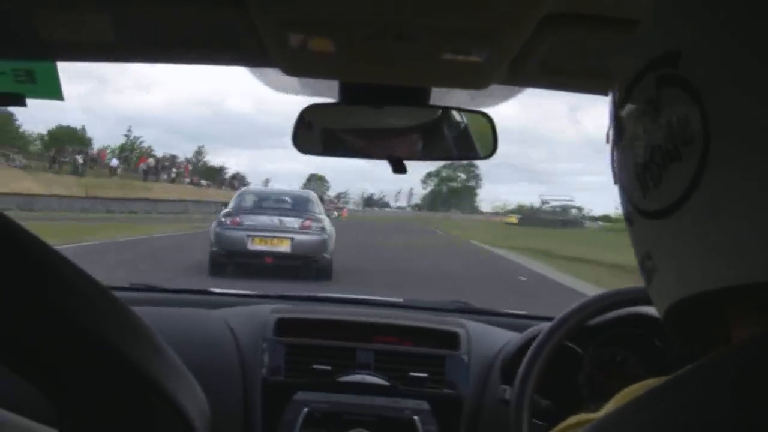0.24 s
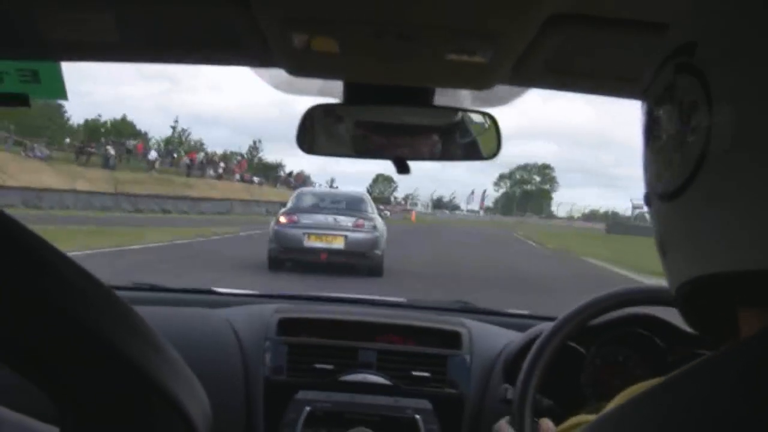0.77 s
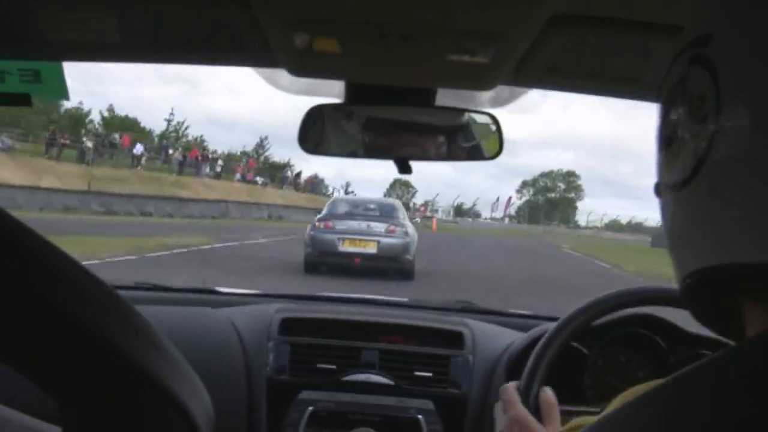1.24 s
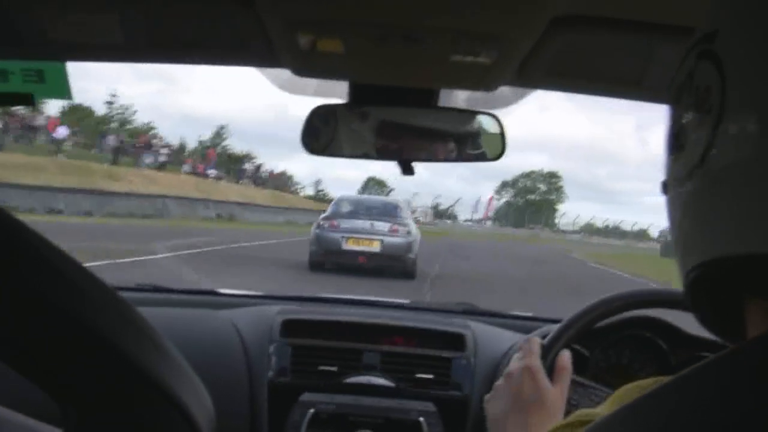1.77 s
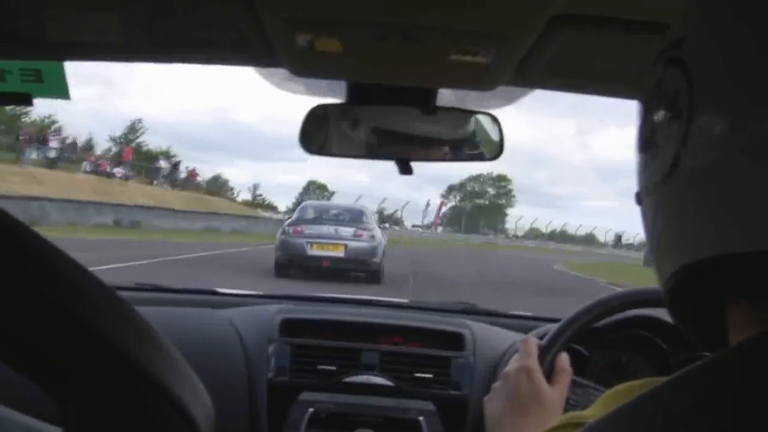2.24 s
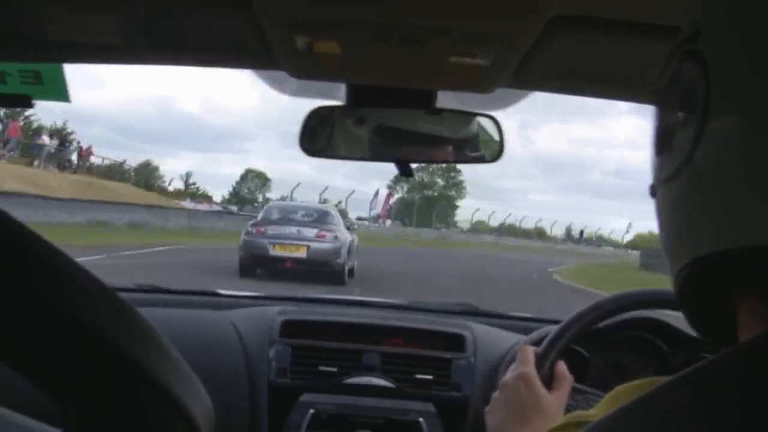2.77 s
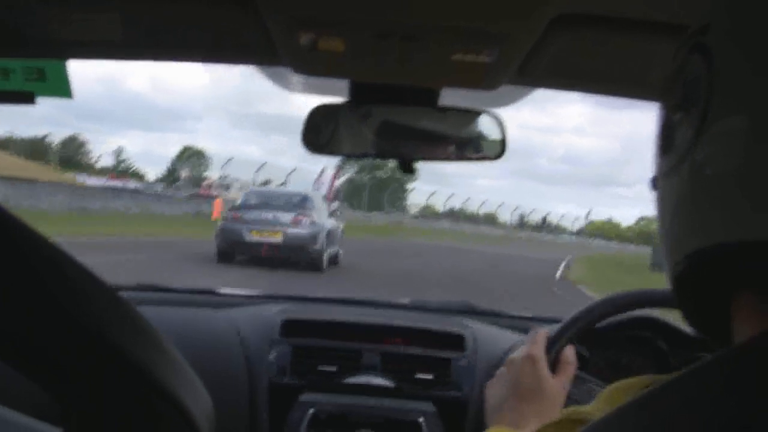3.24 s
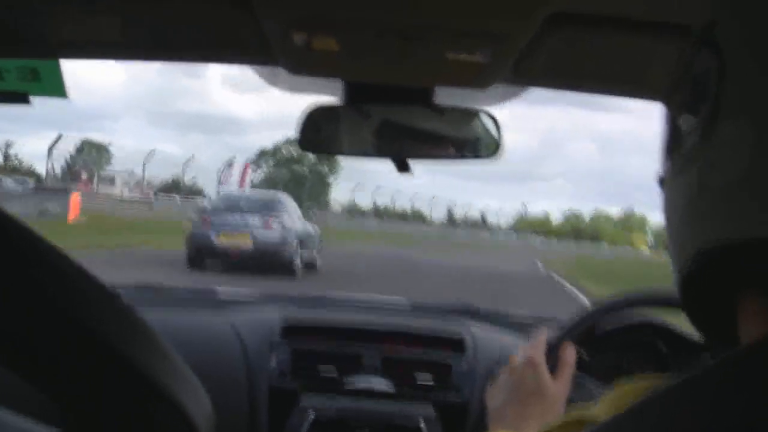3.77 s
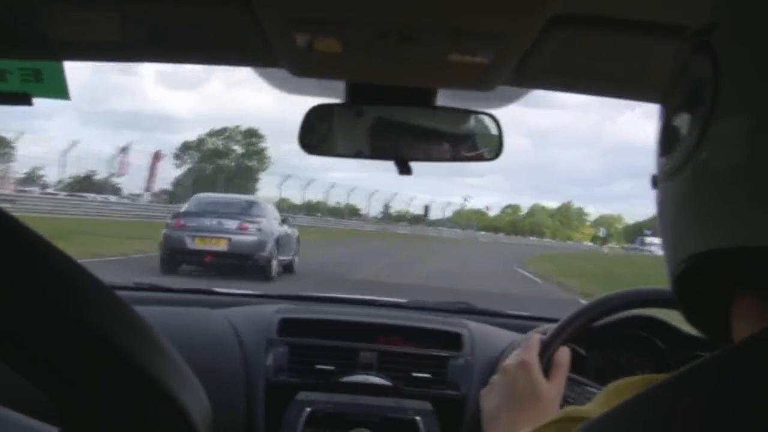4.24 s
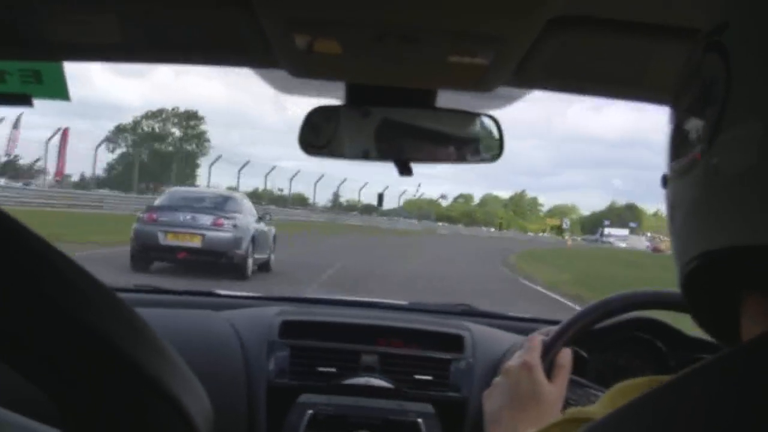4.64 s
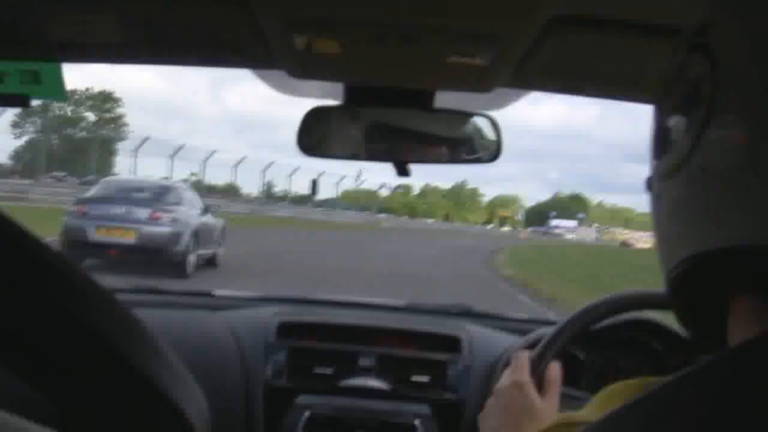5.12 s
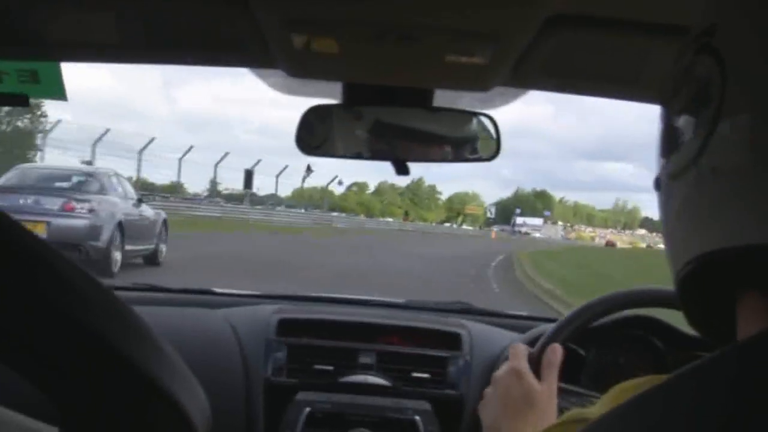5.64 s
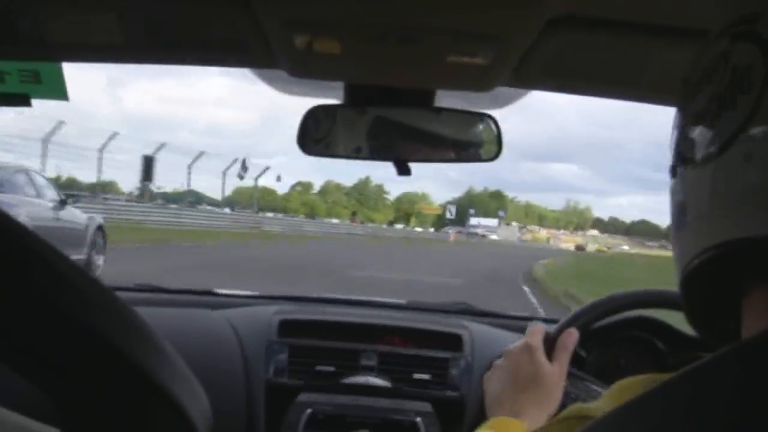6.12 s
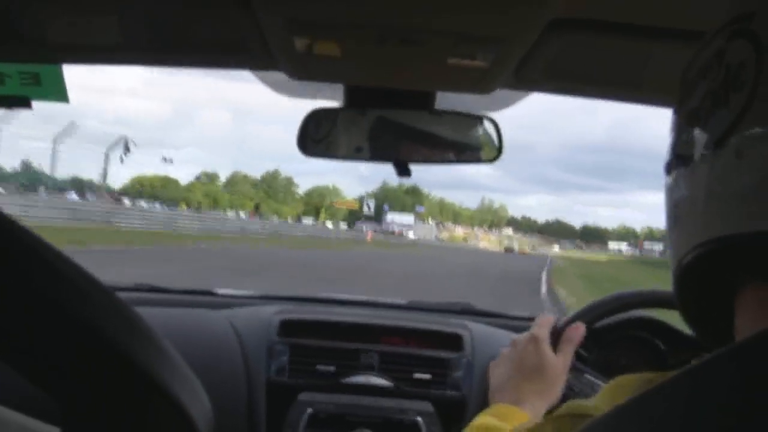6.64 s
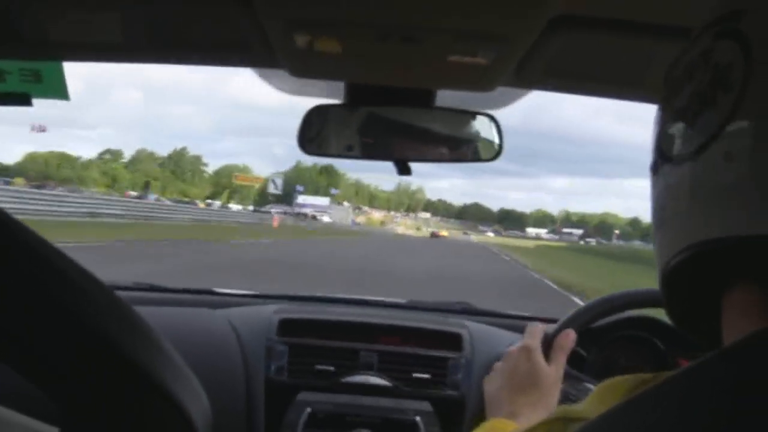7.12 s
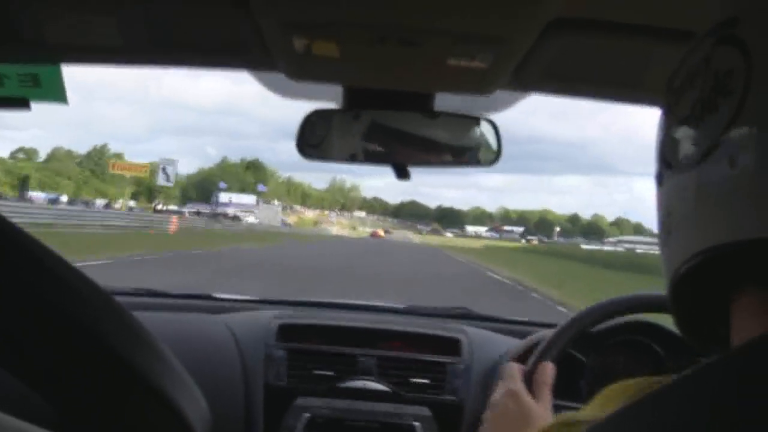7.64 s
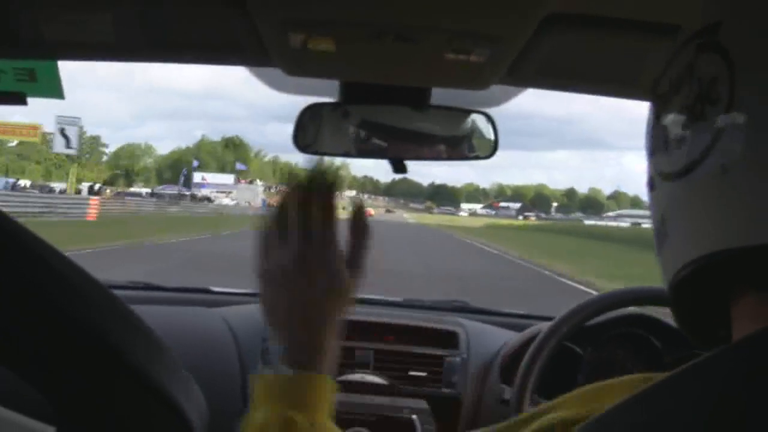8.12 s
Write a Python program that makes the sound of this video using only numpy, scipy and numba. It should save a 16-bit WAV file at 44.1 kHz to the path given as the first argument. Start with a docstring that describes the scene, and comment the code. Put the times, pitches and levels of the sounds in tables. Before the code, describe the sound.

Car cabin at speed: a smooth engine drone dips briefly, then rises without shifting as road roar and window hiss grow and a rival's note passes.

```python
"""Inside a two-rotor coupe, heard by a stereo microphone between the seats: it rolls off the throttle into
a bend, then accelerates in one gear past another car, whose notes come and go and drop at its gear shift.
Engine multiples are sines swept through cabin and mount resonances; tyre rumble is noise fed back each
wheel turn, with thumps. Shaped noise makes boom, a roar rising after the first second, a trim buzz,
gusty window hiss and grit ticks."""
import sys
import numpy as np
from scipy import signal
from scipy.fft import rfft, irfft, next_fast_len
from scipy.io import wavfile
from scipy.ndimage import uniform_filter1d, map_coordinates
from numba import njit

SR = 44100
rng = np.random.default_rng(int(sys.argv[2]) if len(sys.argv) > 2 else 0)


def output_pcm(signal):
    """Save a mono or channel-first signal as 16-bit PCM at the path in sys.argv[1].

    Samples are clipped to [-1, 1] before scaling.
    """
    pcm = np.clip(np.atleast_2d(signal).T, -1, 1) * 32767
    wavfile.write(sys.argv[1], SR, np.round(pcm).astype(np.int16))


N = 369999


def engine(hz, load_db):
    """Clean whole and half multiples of the firing rate; each rises or falls in its own way with revs,
    and drops with less load."""
    # whole multiples, through exhaust and cabin: (multiple, level at low revs [dB], level at high revs [dB])
    whole_orders = [(1, -32, -23), (2, -37, -25), (3, -33, -34), (4, -40, -40.5), (5, -50.5, -41.5),
                    (6, -50.5, -40.5), (9, -51, -70.5)]
    # half multiples from the unequal rotors, through the engine mounts: same columns
    half_orders = [(1.5, -50, -35), (2.5, -49, -40.5), (3.5, -56.5, -53), (4.5, -59, -51.5)]
    # cabin and exhaust resonances: (frequency [Hz], width [Hz], level [dB], side minus mid [dB])
    cabin = [(158.2, 13, -9, -25), (196.5, 14, 4.5, -26.5), (218.4, 6.5, -2.5, -17.5), (231.1, 4.4, -4, -9),
             (257.7, 19.3, 2, -24), (333.8, 16.3, 6, -22.5), (378, 21, -4.5, -26.5), (436.5, 17.4, 7, -33),
             (448.5, 14.3, -4.5, -14), (463.4, 8.7, -8.5, -12.5), (494.4, 24.7, -4.5, -12.5),
             (528, 4.7, -13.5, -15), (575.3, 16, -7.5, -10.5), (593, 20, -7.5, -14), (624.4, 14, -9, -13.5),
             (637, 20, -11, -12), (685.3, 9.2, -4.5, -14), (731, 43, -8, -15), (783, 47, -9, -13),
             (830, 53, -9, -15.5), (918, 9.5, -12, -13), (973, 30, 1.5, -23), (1004, 32, -3, -11),
             (1042, 24, -8, -8), (1089, 17, 1, -9.5), (1136, 25, 1.5, -8.5), (1172, 12, -7, -10),
             (1218, 16, -8.5, -11), (1263, 15, -7, -9), (1315, 13, -6.5, -10), (1363, 25, -6, -8.5),
             (1416, 47, -16, -8.5), (1467, 30, -15, -11.5), (1590, 45, -8.5, -9.5)]
    # resonances of the mounts and bulkhead: same columns
    mounts = [(263, 6.4, -4, -20), (294, 7, 2.5, -23), (365, 25, 4.5, -25), (576.4, 14, 9, -18),
              (440, 12, 1, -18), (648, 15, -1, -15), (668, 18, 4, -16), (728, 26, 3.5, -15),
              (826, 20, 1, -9.5), (1110, 200, 1, -8.5)]
    turns = np.cumsum(hz) / SR
    mid, side = 0, 0
    for orders, resonances in ((whole_orders, cabin), (half_orders, mounts)):
        for multiple, low_db, high_db in orders:
            # higher multiples follow the load more steeply
            load = undb(load_db * (2.0 + 0.75 * (multiple - 1.5)))
            level_db = by_revs(hz, low_db, high_db)
            part = load * tone(multiple * turns, multiple * hz, level_db, resonances)
            mid, side = mid + part[0], side + part[1]
    return np.array([mid + side, mid - side])


def tone(turns, hz, db, resonances):
    """A slightly wavering sine as it arrives through a set of resonances, mid and side."""
    step = 64  # samples between updates of the response
    gain = np.repeat(response(hz[::step], resonances), step, axis=1)[:, :N]
    phase = 2 * np.pi * turns + rng.uniform(0, 2 * np.pi) + .15 * walk(20)
    quick_waver_db = 1.5 * walk(12)
    slow_patches_db = .8 * np.log2(1 + hz / 500) * walk(2.99)  # grows with pitch
    level = np.sqrt(2) * undb(db + quick_waver_db + slow_patches_db)
    return level * (gain * np.exp(1j * phase)).real


def response(hz, resonances):
    """Mid and side response at a moving frequency: resonances add with their phases, leaving dips between;
    neighbouring ones lean to opposite sides of the cabin."""
    modes = [undb(db) / (1 + 2j * (hz - f) / width) for f, width, db, _ in resonances]
    leans = [(-1) ** k * undb(row[-1]) for k, row in enumerate(resonances)]
    return np.array([sum(modes), np.dot(leans, modes)])


def rival():
    """Multiples of the other car's firing rate and two steady tones swell and fade, a little earlier at left."""
    # the other car's engine speed, one gear higher after its shift: (time [s], firing rate [Hz])
    rival_speed = [(2.4, 164), (3.0, 169.9), (4.0, 182.3), (4.4, 185), (4.7, 189), (5.5, 198), (6.1, 204),
                   (6.7, 185.8), (7.4, 189.4), (8.1, 194.2), (8.39, 194.4)]
    # when one multiple comes through: (start [s], length [s], multiple, level [dB])
    rival_notes = [(2.485, 0.846, 2, -35.5), (3.0, 0.044, 1, -38), (3.498, 0.87, 2, -29),
                   (3.998, 0.87, 3, -46.5), (4.946, 0.68, 3, -40), (7.003, 0.12, 2, -27.5),
                   (7.305, 0.26, 2, -21.5), (7.37, 0.055, 1, -28.5), (7.77, 0.034, 1, -29),
                   (8.312, 0.11, 1, -26.5)]
    # two brief steady tones: (start [s], length [s], pitch [Hz], level [dB])
    steady_tones = [(5.5, .2, 365, -33), (7.88, .4, 692, -42.5)]
    rise_s, fall_s = 0.098, 0.094
    turns = np.cumsum(curves(rival_speed)[0]) / SR
    seconds = np.arange(N) / SR
    lean = np.array([[0], [np.pi / 2]])  # the side a quarter cycle ahead of the mid
    notes = np.zeros((2, N))
    for start, length, multiple, db in rival_notes:
        envelope = undb(db) * swell(start, length, rise_s, fall_s)
        notes += envelope * np.sin(2 * np.pi * multiple * turns + lean)
    for start, length, hz, db in steady_tones:
        envelope = undb(db) * swell(start, length, rise_s, fall_s)
        notes += envelope * np.sin(2 * np.pi * hz * seconds + lean)
    return wide(np.sqrt(2) * undb(1.1 * walk(8.1)) * notes)


def road(hz, roar_db):
    """Tyre rumble with thumps, panel boom and tread roar; rumble and boom swell or dip briefly."""
    # brief swells of rumble and boom, dips if negative:
    # (start [s], length [s], rumble rise [dB], boom rise [dB])
    rumble_swells = [(0, 0.23, 1, 0.5), (0.37, 0.039, 2.5, 3), (1.878, 0.09, 1, 1.5),
                     (2.954, 0.13, 2.5, 1.3), (3.37, 0.046, 1.5, 1), (3.572, 0.1, 5, 3),
                     (3.75, .35, 1.5, 2), (4.17, 0.11, 2, 1.5), (4.828, 0.063, 1.5, 4.5),
                     (4.996, 0.15, 1.5, 3.5), (5.76, 0.066, -3, -1.5), (6.627, 0.039, 1.5, 1.5),
                     (6.804, 0.19, 3, 1), (7.6, 0.51, 1.5, 1), (8.296, 0.062, -2.5, 2)]
    rise_s, fall_s = 0.049, 0.045
    swells = np.array([swell(start, length, rise_s, fall_s) for start, length, *_ in rumble_swells])
    rumble_rise, boom_rise = np.transpose(rumble_swells)[-2:] @ swells
    rumble_db = by_revs(hz, -29.5, -24.5) + rumble_rise + 1.0 * walk(10)
    boom_db = by_revs(hz, -32.5, -27) + boom_rise + 1.1 * walk(9)
    wheel_hz = hz / 16.03  # firings per wheel turn
    rumble = tyre_rumble(wheel_hz) + undb(by_revs(hz, 0.5, -2)) * tyre_thumps(wheel_hz)
    return undb(rumble_db) * rumble + undb(boom_db) * panel_boom() + tread_roar(roar_db)


def tyre_rumble(wheel_hz):
    """Low noise whose mid part returns with every wheel turn."""
    # spectrum of the rumble: (frequency [Hz], relative level [dB])
    rumble_colour = [(30, -39.5), (48, -6), (60, -5.5), (84, 1), (100, -2.5), (113, 0), (130, -3),
                     (156, -3), (200, -6), (260, -22), (440, -120)]
    pattern = repeat(rng.standard_normal(N), SR / wheel_hz, 0.31)
    mid_side = [pattern / np.std(pattern), rng.standard_normal(N)]
    return band_rms(colour(wide(mid_side), rumble_colour), 30, 145)


@njit
def repeat(x, lag, keep):
    """Noise fed back one wheel turn later, so the tyre's pattern returns and slowly changes."""
    y = x.copy()
    for i in range(len(x)):
        at = i - lag[i]
        if at >= 0:
            k = int(at)
            y[i] += keep * (y[k] + (at - k) * (y[k + 1] - y[k]))
    return y


def tyre_thumps(wheel_hz):
    """One spot on the tyre strikes each turn and rings two floor-pan modes, in a fresh balance each time."""
    # stretches of harder thumps, softer if negative: (start [s], length [s], rise [dB])
    hard_thumps = [(.05, .12, 2.5), (0.369, .02, 5.5), (.77, .02, 3.5), (1.08, .02, 6), (2.1, .02, -5),
                   (2.82, 0.13, 4), (3.703, 0.015, -5.5), (4.678, .18, 2), (4.983, 0.1, 6.5),
                   (5.25, 0.19, -2), (5.72, .09, 7), (6.64, .1, 3.5), (7.047, 0.29, 1.5), (7.4, .07, -7),
                   (8.09, 0.14, -5)]
    modes_hz, decay_s = (112, 124), .12
    scatter_db, landing = 2, .43  # landing: where in the turn the spot strikes
    turn = np.floor(np.cumsum(wheel_hz) / SR + 1 - landing).astype(int)
    strikes = np.diff(turn, prepend=turn[0])
    strength = undb(scatter_db * rng.standard_normal((turn[-1] + 1, len(modes_hz))))
    blows = strikes * strength[turn].T
    rise_db = sum(db * swell(start, length, 0.018, 0.019) for start, length, db in hard_thumps)
    blows = blows * undb(rise_db)
    t = np.arange(8000) / SR
    envelope = t * np.exp(-np.log(1000) * t / decay_s)  # soft onset
    ring = envelope * np.sin(2 * np.pi * np.outer(modes_hz, t))
    thumps = signal.fftconvolve(blows, ring, axes=1).sum(axis=0)[:N]
    return thumps / np.std(thumps)


def panel_boom():
    """Noise shaped to the hollow boom of the panels."""
    # spectrum of the boom: (frequency [Hz], relative level [dB])
    boom_colour = [(130, -35.5), (170, -9.5), (215, 11.5), (245, 6), (300, 16), (350, 10), (410, 7),
                   (480, -15.5), (560, -33.5), (700, -51)]
    return band_rms(colour(wide(rng.standard_normal((2, N))), boom_colour), 150, 500)


def tread_roar(roar_db):
    """Noise of the tread, which brightens as it grows and rings the trim."""
    # spectrum of the roar: (frequency [Hz], relative level [dB])
    roar_colour = [(260, -15.5), (450, -1), (485, -2), (547, -5.5), (672, -5.5), (733, -6.5), (1070, -9.5),
                   (1270, -14.5), (1470, -15), (1670, -16), (1960, -20), (2520, -23), (2660, -25.5),
                   (3420, -32), (6000, -48.5), (7800, -63.5), (13200, -120)]
    roar = band_rms(colour(wide(rng.standard_normal((2, N))), roar_colour), 1600, 2800)
    roar = tilt(roar, 1400, 0.53 * (roar_db + 47.0))
    return trim(undb(roar_db + 1.6 * walk(12)) * roar)


def wind(gust_db):
    """Hiss at the window seal with a fluttering level; its top above 9850 Hz follows the level."""
    # wind hiss between gusts: (time [s], level [dB])
    steady_wind = [(0, -63.5), (.5, -65.5), (1.05, -69.5), (1.8, -69), (1.95, -65.5), (2.8, -66.5),
                   (3.4, -63.5), (4.3, -60), (5.3, -57), (6.4, -55.5), (8.39, -52.5)]
    # spectrum of the hiss: (frequency [Hz], relative level [dB])
    hiss_colour = [(1470, 0.5), (2500, -6), (2680, -1.5), (3410, -11), (5130, -11), (5790, -14),
                   (9050, -15.5), (14200, -21.5), (15200, -31.5)]
    wind_db = curves(steady_wind)[0] + gust_db
    hiss = band_rms(colour(wide(rng.standard_normal((2, N))), hiss_colour), 4500, 12000)
    flutter_db = 0.9 * walk(28) + 1.3 * walk(16)
    return undb(wind_db + flutter_db) * tilt(hiss, 9850, 0.43 * (wind_db + 41.5))


def gusts():
    """How far the gusts lift the wind above its steady level, in dB."""
    # gusts at the window, a lull if negative: (start [s], length [s], rise [dB])
    gust_table = [(0.227, 0.015, 2.5), (0.55, .02, 5.5), (0.602, 0.065, 4.5), (0.69, 0.088, 5),
                  (0.94, .01, -5), (1.047, .02, 5.5), (1.82, .02, 2), (2.206, 0.015, 4), (2.892, 0.043, 2),
                  (3.5, 0.14, 3.5), (3.78, 0.025, 3.5), (4.022, 0.068, 5), (4.129, 0.01, 6),
                  (4.228, 0.06, 5), (4.315, 0.025, 7.5), (4.391, 0.016, 7), (4.426, 0.033, 5),
                  (4.725, 0.13, 5), (4.895, 0.11, 5), (5.093, 0.053, 2), (5.393, .01, 3.5),
                  (5.452, 0.077, 5), (5.886, 0.24, 3.5), (6.248, .05, -4), (6.758, 0.24, 3.5),
                  (7.54, 0.026, 3), (7.676, 0.12, 2.5), (7.96, 0.079, 2), (8.3, 0.026, -0.5)]
    return sum(db * swell(start, length, 0.011, 0.014) for start, length, db in gust_table)


def trim(x):
    """Narrow peaks and dips that trim panels add as they ring in the roar and hiss."""
    # trim panels: (frequency [Hz], width [Hz], peak or dip [dB])
    panels = [(1675, 64, -7.5), (1783, 43, 2.5), (1824, 40, -4.5), (1936, 48, 4.5), (2230, 38, 7),
              (2275, 40, -2), (2500, 46, -3.5), (3010, 40, 3), (3640, 60, 4.5), (3720, 60, -3),
              (3900, 50, 3.5), (4130, 54, 2.5), (4370, 70, 5.5), (4920, 120, 2), (5310, 110, 3.5),
              (5390, 50, -3.5)]
    hz = np.geomspace(1000, 8000, 1500)
    gain_db = sum(db / (1 + (2 * (hz - f) / width) ** 2) for f, width, db in panels)
    return colour(x, np.transpose([hz, gain_db]))


def shake(hz):
    """The body's slow, deepest shaking: low noise that grows with revs."""
    # spectrum of the shaking: (frequency [Hz], relative level [dB])
    shake_colour = [(12, -30), (20, -4), (30, -2), (40, 0), (52, -4), (70, -16), (100, -40), (200, -130)]
    body = band_rms(colour(wide(rng.standard_normal((2, N))), shake_colour), 15, 60)
    return undb(by_revs(hz, -37, -33)) * body


def buzz(roar_db):
    """A trim part shaken by the road: a narrow band of noise that sings in flecks and follows the roar."""
    centre_hz, width_hz, level_db = 2207, 71, -19.5  # level relative to the roar
    edges = [centre_hz - width_hz / 2, centre_hz + width_hz / 2]
    band = signal.butter(2, edges, "band", fs=SR, output="sos")
    ring = signal.sosfilt(band, rng.standard_normal(N))
    return undb(roar_db + level_db + 4.3 * walk(21)) * ring / np.std(ring)


def grit():
    """Grit on the body: short bright noise ticks with a small tail."""
    # ticks: (time [s], level before colouring [dB])
    ticks = [(0.2274, -55), (0.5472, -52), (0.6968, -47), (0.9358, -51), (0.9996, -54), (1.0395, -51),
             (1.285, -52), (1.8236, -52.5), (2.062, -39), (3.6054, -49)]
    out, t = np.zeros((2, N)), np.arange(2000) / SR
    envelope = np.exp(-t / 0.004) + 0.3 * np.exp(-t / .014)
    for start, db in ticks:
        at = int(start * SR)
        out[:, at:at + len(t)] += undb(db) * rng.standard_normal((2, len(t))) * envelope
    return colour(out, [(2000, -17), (3800, 2.5), (7500, -0.5), (9500, -7), (15000, -19)])


def undb(db):
    """Decibels to an amplitude factor."""
    return 10 ** (np.asarray(db) / 20)


def curves(table):
    """Columns of a (time [s], ..) table at every sample."""
    s, *columns = np.transpose(table)
    return [np.interp(np.arange(N) / SR, s, c) for c in columns]


def by_revs(hz, low_db, high_db):
    """A level that moves in step with the engine speed, from 154 to 257 firings a second."""
    return low_db + (high_db - low_db) * (hz - 154) / (257 - 154)


def swell(start, length, rise_s, fall_s):
    """0 to 1: a soft rise up to the start, a hold, a soft fall."""
    t = np.arange(N) / SR
    before, after = np.maximum(start - t, 0), np.maximum(t - start - length, 0)
    return np.exp(-(before / rise_s) ** 2 - (after / fall_s) ** 2)


def walk(rate):
    """Random levels held 1 / rate s and smoothed twice; spread near 1."""
    k = int(SR / rate)
    steps = np.repeat(rng.standard_normal(N // k + 1), k)
    return 0.75 * uniform_filter1d(uniform_filter1d(steps, k), k)[:N]


def colour(x, points):
    """Shape a sound by (Hz, dB) points; the ends are mirrored outwards so that they do not click."""
    hz, db = np.transpose(points)
    edge = SR // 8
    x = np.pad(x, [(0, 0)] * (np.ndim(x) - 1) + [(edge, edge)], mode="reflect")
    size = next_fast_len(x.shape[-1])
    bins_hz = np.fft.rfftfreq(size, 1 / SR)
    gain = undb(np.interp(np.log(bins_hz + 1), np.log(hz), db))
    return irfft(rfft(x, size) * gain, size)[..., edge:edge + N]


def tilt(x, split_hz, high_db):
    """Change the part of a sound above split_hz by a moving gain."""
    low = signal.sosfiltfilt(signal.butter(3, split_hz, fs=SR, output="sos"), x)
    return low + undb(high_db) * (x - low)


def band_rms(x, lo_hz, hi_hz):
    """Scale a sound to rms 1 within a band."""
    part = signal.sosfilt(signal.butter(4, [lo_hz, hi_hz], "band", fs=SR, output="sos"), x)
    return x / np.std(part)


def wide(x):
    """Mid and side as left and right, the side weaker in the bass."""
    # stereo width: (frequency [Hz], side minus mid [dB])
    width_points = [(25, -14.5), (45, -16), (62, -21), (110, -21.5), (200, -19), (300, -22), (450, -17),
                    (690, -11.5), (1280, -8), (2360, -6.5), (4350, -4.5), (8030, -5), (14800, -3.5)]
    mid, side = x[0], colour(x[1], width_points)
    return np.array([mid + side, mid - side])


def scene():
    """All sources at a microphone between the seats."""
    # own engine speed: (time [s], firing rate [Hz])
    engine_speed = [(0, 155.7), (.4, 156.5), (.8, 153.9), (1.0, 153.3), (1.2, 154.5), (1.6, 158.6),
                    (2.0, 164.2), (2.8, 176.0), (3.6, 188.9), (4.4, 200.7), (5.6, 217.9), (6.4, 230.3),
                    (7.2, 241.9), (8.0, 252.6), (8.39, 257.2)]
    # lifted into the bend, then fully open: (time [s], load [dB], scaled for each multiple)
    throttle = [(0, -1.5), (.4, -3.5), (.85, -6), (1.0, -2.8), (1.3, -1.4), (2.0, 0)]
    # tread roar without gusts: (time [s], level [dB])
    roar_level = [(0, -50.5), (.7, -52.5), (1.1, -53), (1.7, -52), (2.1, -51), (3.1, -50), (4.0, -48),
                  (5.5, -47), (7.0, -44.5), (8.39, -43.5)]
    hz, load_db, gust_db = curves(engine_speed)[0], curves(throttle)[0], gusts()
    roar_db = curves(roar_level)[0] + 0.21 * gust_db  # gusts lift the roar a little too
    cars = engine(hz, load_db) + rival()
    return cars + road(hz, roar_db) + trim(wind(gust_db)) + shake(hz) + buzz(roar_db) + grit()


def record(dry):
    """The two microphone ports differ a little in colour and timing; soft ends, and the top is cut."""
    # balance of the ports: (frequency [Hz], left minus right [dB])
    balance = [(60, -1), (380, 0), (1280, 0), (2360, 0.8), (4350, .8), (14800, 0)]
    left_lead_s, fade_s, top_hz = 1.2e-5, .004, 15400
    left = colour(dry[0], np.multiply(balance, [1, .5]))
    right = colour(dry[1], np.multiply(balance, [1, -.5]))
    right = map_coordinates(right, [np.arange(N) - left_lead_s * SR], order=5, mode="mirror")
    to_nearest_end = np.minimum(np.arange(N), np.arange(N)[::-1]) / SR
    fade = np.minimum(to_nearest_end / fade_s, 1)
    top_cut = signal.ellip(12, .2, 80, top_hz, fs=SR, output="sos")
    return signal.sosfilt(top_cut, fade * [left, right])


dry = scene()
out = record(dry)
output_pcm(out)
```